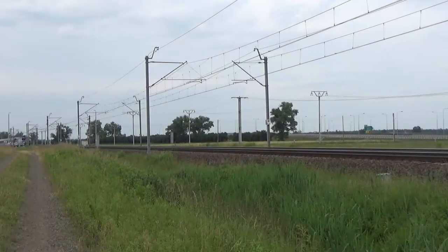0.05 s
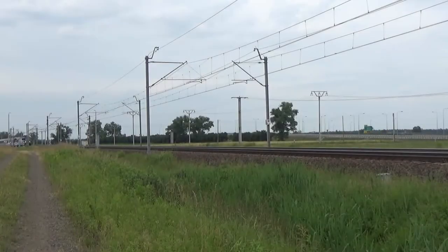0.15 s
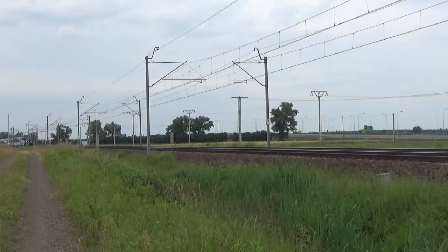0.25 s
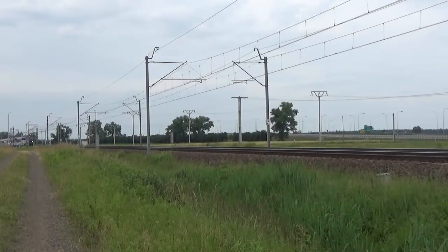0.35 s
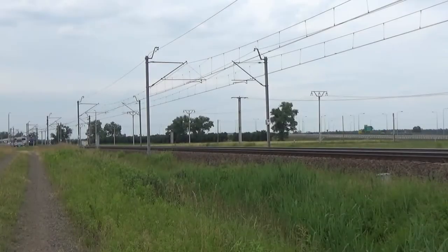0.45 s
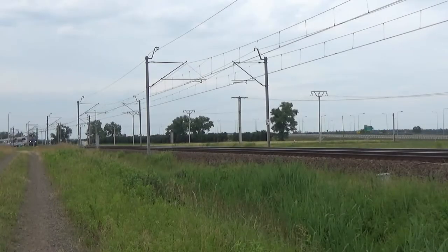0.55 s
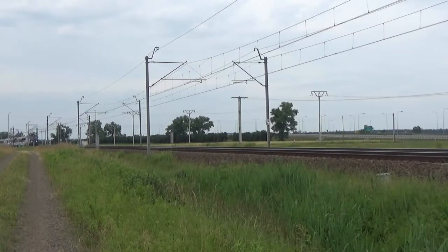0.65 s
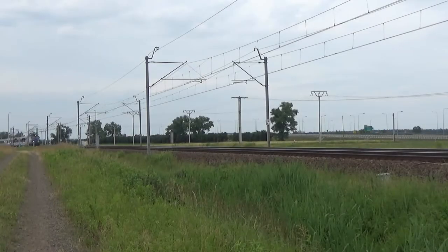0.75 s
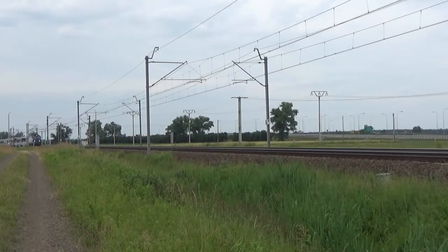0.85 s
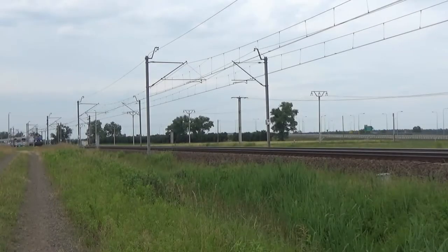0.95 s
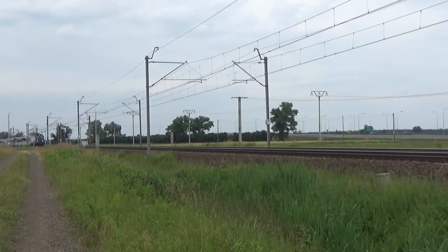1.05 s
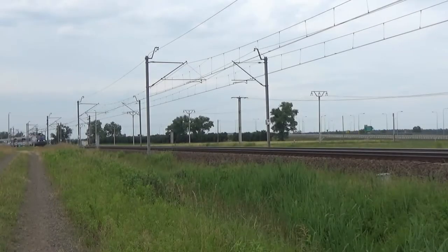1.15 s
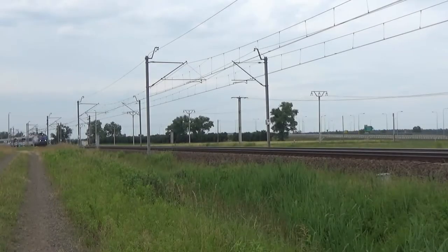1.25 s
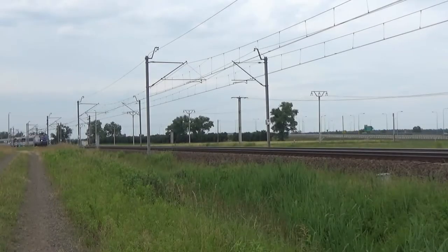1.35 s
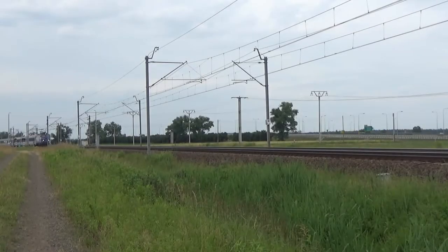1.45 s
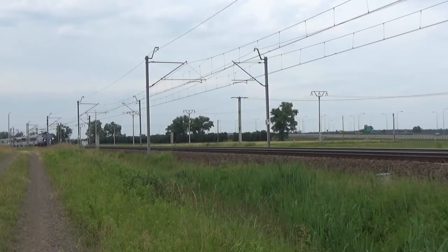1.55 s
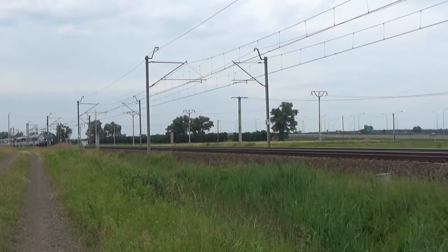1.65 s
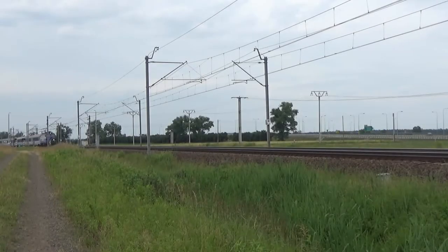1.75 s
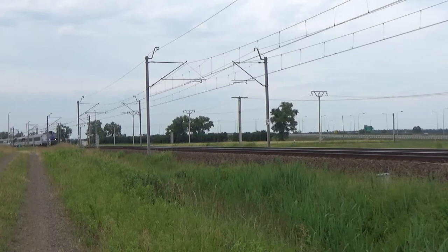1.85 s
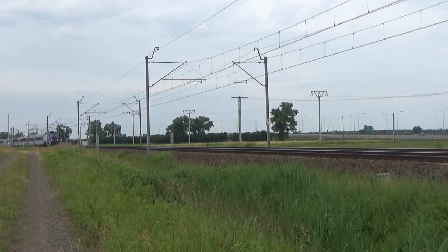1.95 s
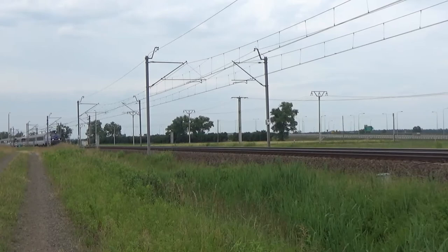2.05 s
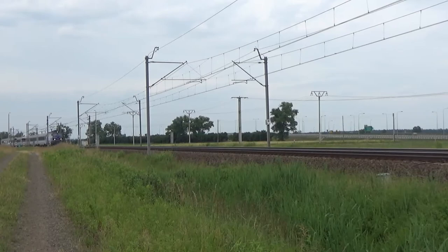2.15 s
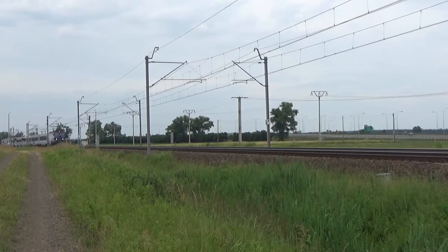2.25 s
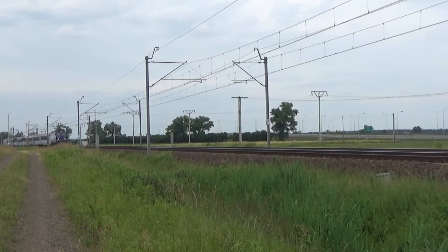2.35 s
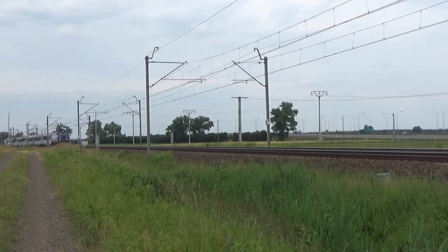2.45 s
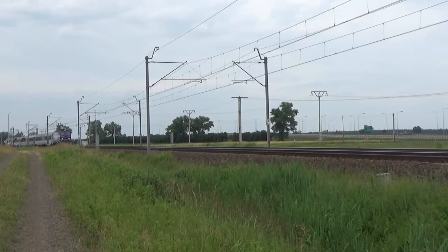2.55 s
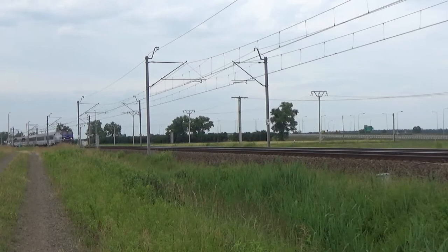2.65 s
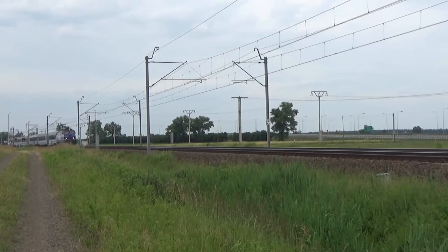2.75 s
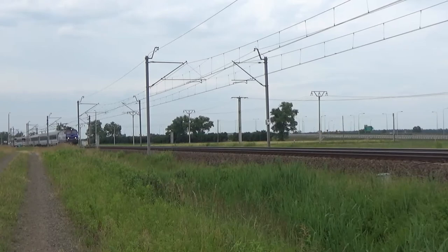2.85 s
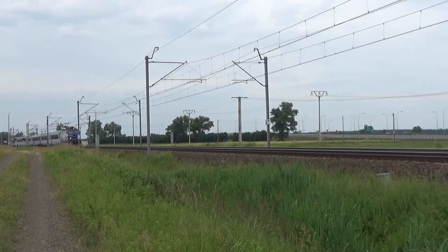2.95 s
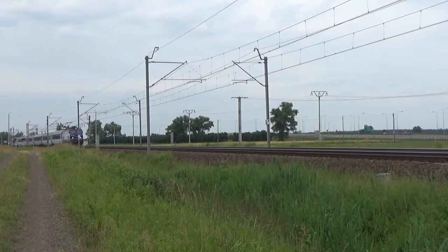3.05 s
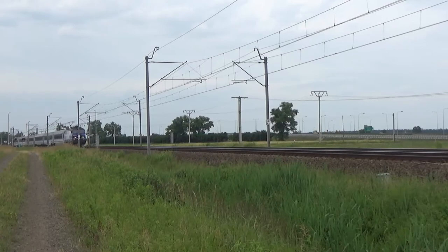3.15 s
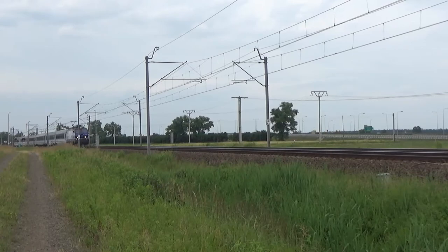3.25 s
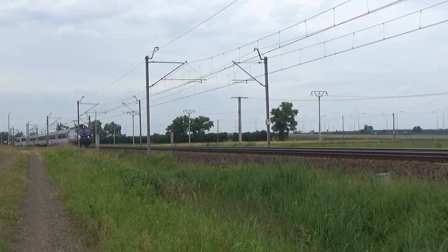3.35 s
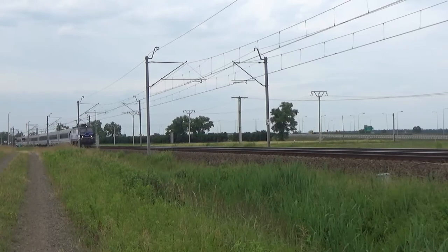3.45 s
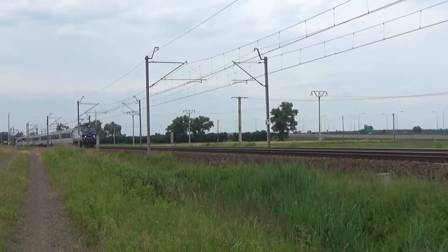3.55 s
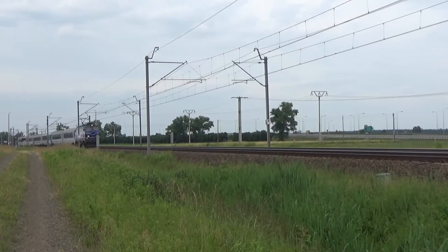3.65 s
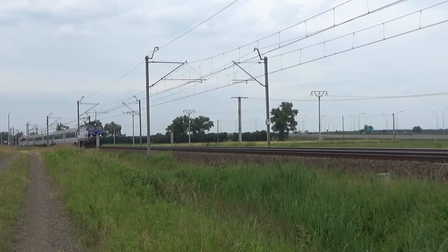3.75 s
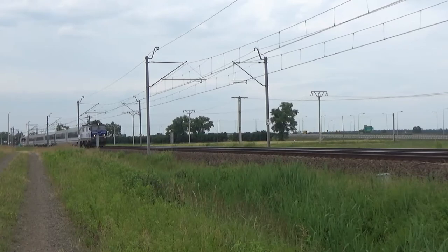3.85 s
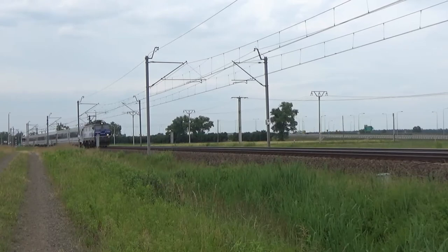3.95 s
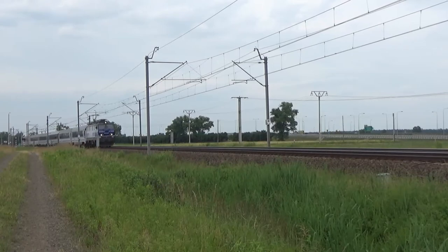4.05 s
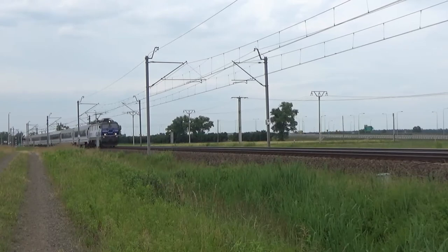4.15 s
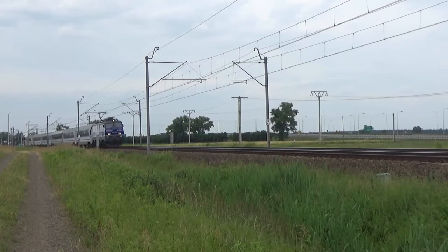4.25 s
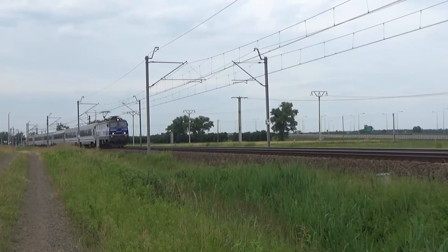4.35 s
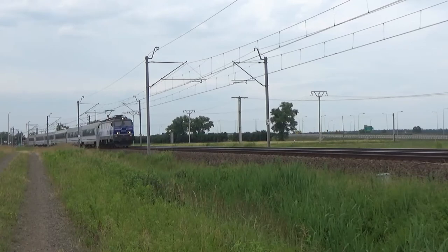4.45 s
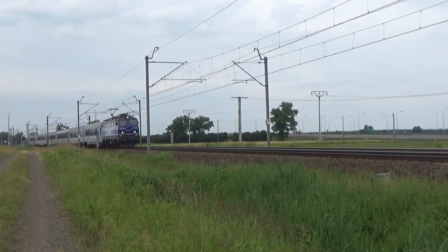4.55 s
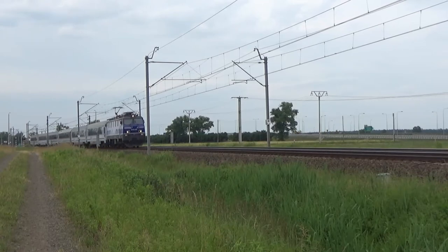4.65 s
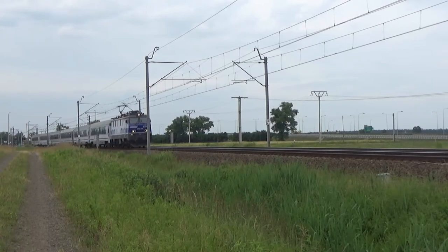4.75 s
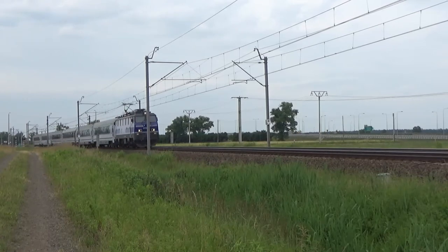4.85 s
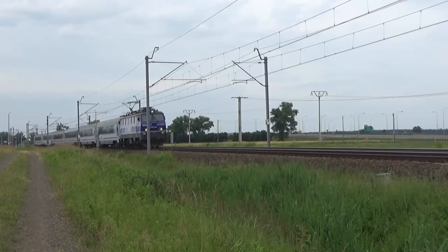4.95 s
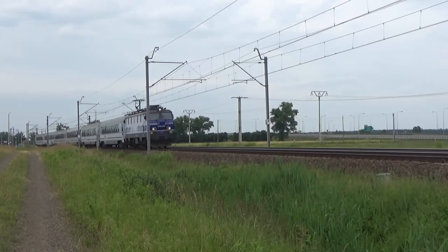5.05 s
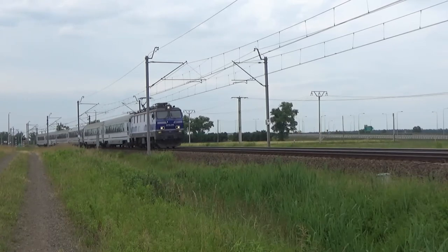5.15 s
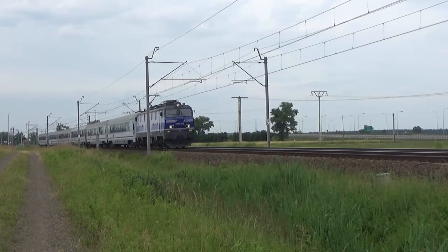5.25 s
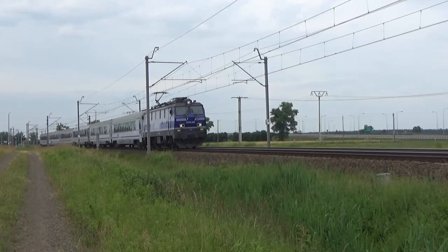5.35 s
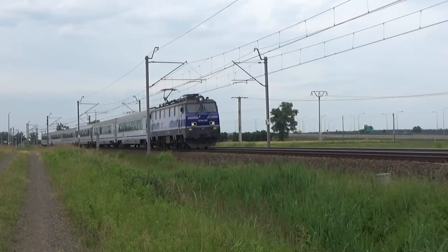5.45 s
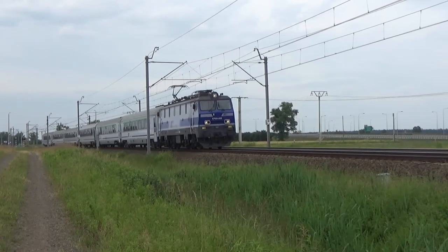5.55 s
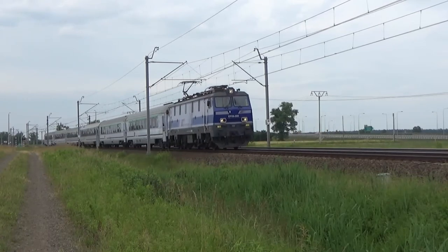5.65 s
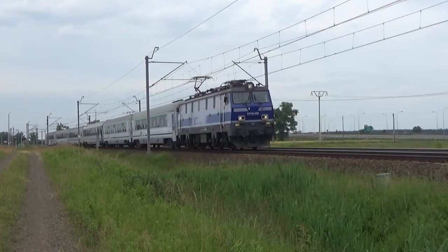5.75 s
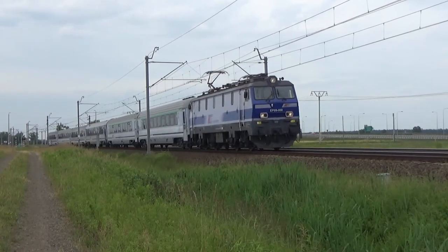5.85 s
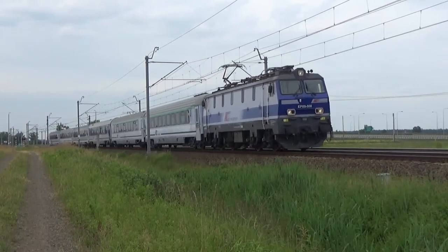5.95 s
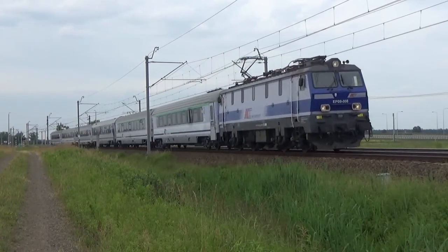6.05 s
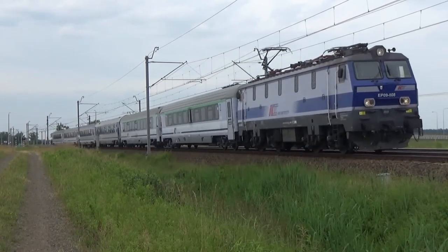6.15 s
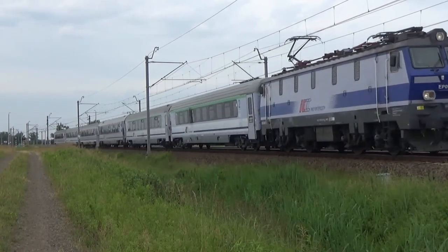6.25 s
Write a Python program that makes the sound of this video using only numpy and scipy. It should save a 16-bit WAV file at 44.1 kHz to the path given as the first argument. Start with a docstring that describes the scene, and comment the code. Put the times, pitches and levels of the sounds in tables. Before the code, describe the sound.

In open country beside a railway line, an electric passenger train roars far off with a faint gear note. A small bird on the right ticks, trills and jangles. Meanwhile the rails start singing on the right, with metallic zings running ahead of the wheels. Rumble and hiss swell steadily as the train nears the trackside microphone, joined by overhead wire sizzle and a thin whine that dips slightly in pitch.

```python
"""Grass beside a railway line: an electric locomotive with coaches approaches at speed.
Its wheels roar far off; then the rails on the right sing ahead of it, and rumble and hiss swell.
Later the pantograph sizzles along the wire; a gear note and a thin whine sink in pitch (Doppler).
In the field insects fizz faintly, a grasshopper rasps, and a bunting ticks, trills and jangles."""
import sys
import numpy as np
from scipy.fft import rfft, irfft, next_fast_len
from scipy.io import wavfile
from scipy.ndimage import map_coordinates

SR = 44100
rng = np.random.default_rng(int(sys.argv[2]) if len(sys.argv) > 2 else 0)


def dump_mix(stems):
    """Bounce the given channels to the path in sys.argv[1] as a 16-bit WAV at rate SR."""
    frames = np.atleast_2d(stems).T  # one column per channel
    limited = np.clip(frames, -1, 1)  # hard clip at full scale
    pcm = np.round(limited * 32767).astype(np.int16)
    wavfile.write(sys.argv[1], SR, pcm)


N = 278712
SPEED_M_PER_S, SOUND_M_PER_S = 40, 343
ABREAST_S = 6.6  # train draws level with the listener
TRACK_M, NEAR_M = 12, 35  # track offset; range within which a long train grows no louder


def amp(db):
    """Decibels to gain."""
    return 10 ** (np.asarray(db) / 20)


def unit(x):
    """Scale to rms 1."""
    return x / np.sqrt(np.mean(x ** 2) + 1e-20)


def clock():
    """Sample times [s]."""
    return np.arange(N) / SR


def curve(rows):
    """Per-sample line through (time [s], value) rows."""
    return np.interp(clock(), *np.transpose(rows))


def ramp(start_s, rise_s):
    """Linear rise from 0 to 1."""
    return np.clip((clock() - start_s) / rise_s, 0, 1)


def bumps(rows):
    """Gaussian swells from (time [s], height, half length [s]) rows."""
    return sum(height * np.exp(-((clock() - s) / half_s) ** 2) for s, height, half_s in rows)


def wobble(rate_hz):
    """Smooth random curve, rate_hz knots a second."""
    return map_coordinates(rng.standard_normal(int(N * rate_hz / SR) + 4), [clock() * rate_hz])


def filtered(x, response):
    """Apply a frequency response by zero-padded FFT."""
    size = next_fast_len(N + 8192)
    return irfft(rfft(x, size) * response(np.fft.rfftfreq(size, 1 / SR)), size)[..., :N]


def colour(points):
    """Response through (frequency [Hz], level [dB]) points; 40 dB down an octave beyond each end."""
    knots_hz, db = np.transpose(points)
    knots_hz = np.r_[knots_hz[0] / 2, knots_hz, knots_hz[-1] * 2]
    db = np.r_[db[0] - 40, db, db[-1] - 40]
    return lambda hz: amp(np.interp(np.log(hz + 1), np.log(knots_hz), db))


def resonances(modes):
    """Response of (frequency [Hz], width [Hz], level [dB]) modes; powers add."""
    return lambda hz: np.sqrt(sum((amp(db) / (1 + ((hz - centre_hz) / width_hz) ** 2)) ** 2
                                  for centre_hz, width_hz, db in modes))


def panned(x, left_db):
    """Pan by level of left over right."""
    return x * amp([[left_db / 2], [-left_db / 2]])


def rush(response, side_db, left_db):
    """Filtered stereo noise; side_db sets the width."""
    mid, side = unit(filtered(rng.standard_normal((2, N)), response))
    return panned(mid + amp(side_db) * np.array([side, -side]), left_db)


def tone(hz, drift_hz, drift_rate_hz):
    """Sine of rms 1 with random pitch tremble."""
    return np.sqrt(2) * np.sin(2 * np.pi * np.cumsum(hz + drift_hz * wobble(drift_rate_hz)) / SR)


def to_go_m():
    """Track left until the train is abreast."""
    return SPEED_M_PER_S * (ABREAST_S - clock())


def distance_m():
    """Effective range of the train, levelling off at NEAR_M."""
    return (NEAR_M ** 4 + to_go_m() ** 4) ** (1 / 4)


def approach(near_db, doubling_db=0, db_per_m=0, carry=0):
    """Level [dB] of a train source after spreading, absorption and the field's varying carry."""
    # how well sound carries over the field: (time [s], relative level [dB])
    field_carry = [(0, -4.5), (1.2, .5), (1.8, 1.0), (2.55, 3.7), (3.75, -.1), (6.32, .5)]
    range_m = distance_m()
    spreading_db = doubling_db * np.log2(range_m / NEAR_M)
    absorption_db = db_per_m * (range_m - NEAR_M)
    return near_db - spreading_db - absorption_db + carry * curve(field_carry)


def wheels():
    """Rough steel rolls on steel: the roar carries far, hiss and wheel ringing only from close by."""
    # spectra: (frequency [Hz], relative density [dB])
    ground_band = [(15, -1), (30, 1), (55, 1), (82, 6), (105, -2), (160, -12)]  # deep bass of the moving mass
    rumble_band = [(45, -34), (85, -18), (120, -12.5), (150, -11.5), (200, -6.5), (250, -6), (305, 0),
                   (370, -1), (440, -4.5), (520, -2), (640, -14)]
    roar_band = [(390, -24), (480, -15.5), (530, -10.5), (590, -7.5), (690, -10), (820, -2), (1030, -5),
                 (1260, -0.5), (1370, 2.5), (1520, -1), (2000, -2), (2900, -6.5), (3500, -12.5),
                 (4800, -21), (6500, -40)]
    top_band = [(2600, -15), (3800, -2), (5000, -2), (6000, -7), (7500, -15), (9000, -24)]  # roar's treble, absorbed by air
    hiss_band = [(2400, -16), (3200, -4.5), (4000, -0.5), (5000, -2.5), (6000, -3.5), (7000, -4),
                 (8000, -4.5), (9300, -5.5), (10500, -12.5), (11500, -16), (15500, -37)]
    # wheel modes: (frequency [Hz], width [Hz], relative level [dB])
    wheel_modes = [(489, 40, -7.5), (621, 71, 0), (1110, 82, -3), (1470, 50, -8), (1688, 130, 2.5),
                   (2350, 43, -3)]
    air_db = .27 * wobble(14)  # flutter from moving air
    width_db = approach(near_db=0, doubling_db=2.4)  # train widens as it nears
    ground_db = approach(near_db=-54.8, doubling_db=6.7, carry=.3)
    rumble_db = approach(near_db=-32.9, doubling_db=7.5, carry=.55)
    roar_db = approach(near_db=-21.9, doubling_db=4.9, carry=1) + air_db
    top_db = approach(near_db=-34, doubling_db=2.7, db_per_m=.048, carry=1.55) + air_db
    hiss_db = approach(near_db=-25.6, doubling_db=1, db_per_m=.18) + air_db
    ring_db = approach(near_db=-22.1, doubling_db=1.7, db_per_m=.175)
    ground = amp(ground_db) * rush(colour(ground_band), side_db=1.5 * width_db - 10, left_db=-.8)
    rumble = amp(rumble_db) * rush(colour(rumble_band), side_db=width_db - 19.5, left_db=.5)
    roar = amp(roar_db) * rush(colour(roar_band), side_db=-15, left_db=.95)
    top = amp(top_db) * rush(colour(top_band), side_db=-20, left_db=.5)
    hiss = amp(hiss_db + .7 * wobble(25)) * rush(colour(hiss_band), side_db=-11.5, left_db=-1.5)
    ring = amp(ring_db) * rush(resonances(wheel_modes), side_db=-10.5, left_db=-3.5)
    return ground + rumble + roar + top + hiss + ring


def high_sizzle():
    """Faint insect fizz in the grass at first, then the pantograph sliding on the wire."""
    # steady top treble: (time [s], relative level [dB])
    treble_levels = [(0.0, -70), (1.41, -64), (3.03, -54), (3.41, -49), (4.61, -49), (5.23, -43),
                     (6.32, -44)]
    # spurts where wire contact lightens: (time [s], level [dB], half length [s])
    spurts = [(3.29, -49, .07), (4.382, -47, .03), (4.58, -49, .03), (5.068, -42, .035), (5.276, -37, .04),
              (5.496, -37, .05), (5.756, -40, .03)]
    # spectra: (frequency [Hz], relative density [dB])
    treble_band = [(5000, -20), (8000, -28), (9800, 3), (10300, 8), (11600, 1.5), (12500, 2), (13100, 4.5),
                   (14500, 0), (15600, -3)]
    spurt_band = [(5000, -20), (8500, -6), (10500, 2), (13000, 6), (14000, -7), (15600, -11)]
    steady_db = curve(treble_levels) + 3.5 + .9 * wobble(20)
    steady = amp(steady_db) * rush(colour(treble_band), side_db=-19, left_db=.5)
    spurt_gain = bumps([(s, amp(db), half_s) for s, db, half_s in spurts]) * amp(2.2 * wobble(300))
    return steady + spurt_gain * rush(colour(spurt_band), side_db=-17, left_db=0)


def drive():
    """Locomotive gear note and high whine; their Doppler shift falls as the train draws level."""
    whine_hz, gear_hz = 9465, 1780  # as heard at 0 s
    # gear note surfacing from the roar: (time [s], level [dB], half length [s])
    gear_swells = [(.68, -45.5, .08), (.87, -47.5, .13), (1.75, -48, .2), (2.65, -44.5, .18),
                   (3.45, -47, .15)]
    closing_m_per_s = SPEED_M_PER_S * to_go_m() / np.hypot(TRACK_M, to_go_m())
    doppler = 1 / (1 - closing_m_per_s / SOUND_M_PER_S)
    doppler = doppler / doppler[0]
    whine_db = approach(near_db=-44, db_per_m=.22) + 2 * wobble(45)
    whine = amp(whine_db) * tone(whine_hz * doppler, drift_hz=30, drift_rate_hz=230)
    gear_gain = amp(approach(near_db=-47.6, doubling_db=2.6))
    gear_gain += bumps([(s, amp(db), half_s) for s, db, half_s in gear_swells])
    gear = amp(1.2 * wobble(10)) * tone(gear_hz * doppler, drift_hz=4.46, drift_rate_hz=50)
    upper = amp(-9 + 2.5 * wobble(8)) * tone(gear_hz * 5 / 4 * doppler, drift_hz=8, drift_rate_hz=50)
    return panned(whine + gear_gain * (gear + upper), left_db=1.5)


def grasshopper():
    """Each stroke of the file is a grainy rasp in the wings' band."""
    # strokes: (time [s], level [dB], half length [s])
    rasps = [(.86, -66, .06), (1.13, -61, .05), (1.73, -62, .04)]
    # wing resonance: (frequency [Hz], width [Hz], relative level [dB])
    wing_modes = [(13400, 800, 0)]
    strokes = bumps([(s, amp(db), half_s) for s, db, half_s in rasps])
    return strokes * amp(2 * wobble(200)) * rush(resonances(wing_modes), side_db=-16, left_db=0)


def chip(time_s, hz, sweep_hz, half_s):
    """One bird note of peak 1, sweeping through hz at time_s."""
    u = np.linspace(-3, 3, int(6 * half_s * SR))  # time in half lengths
    note = np.exp(-u ** 2) * np.sin(2 * np.pi * np.cumsum(hz + sweep_hz * np.tanh(u)) / SR)
    start = int(time_s * SR) - len(u) // 2
    return np.pad(note, (start, N - start - len(u)))


def bunting():
    """Upswept ticks speed up, climb through a trill and tumble into a jangle of random notes."""
    # opening ticks: (time [s], level [dB])
    ticks = [(1.275, -52), (1.476, -44), (1.641, -42.5), (1.784, -40)]
    # closing jangle: (start [s], end [s], mean pitch [Hz], mean level [dB])
    jangle = [(2.25, 2.36, 4750, -48), (2.401, 3.12, 5400, -49.5), (2.52, 3, 7250, -45.5)]
    tick_hz, top_hz, climb = 6100, 7100, .45  # climb: share of the gap to top_hz closed per note
    trill_start_s, trill_gap_s, trill_db, jangle_gap_s = 1.901, .0502, -44, .025
    notes = [(s, tick_hz, db) for s, db in ticks]
    for k in range(7):
        trill_hz = top_hz - (top_hz - tick_hz) * (1 - climb) ** (k + 1)
        notes.append((trill_start_s + k * trill_gap_s, trill_hz, trill_db))
    song = sum(amp(db) * chip(s, hz, sweep_hz=899, half_s=.0027) for s, hz, db in notes)
    for start_s, end_s, hz, db in jangle:
        for s in np.arange(start_s, end_s, jangle_gap_s):
            late, pitch, sweep, size = rng.standard_normal(4)
            note = chip(s + .008 * late, hz + 220 * pitch, sweep_hz=400 * sweep, half_s=.005)
            song += amp(db + 1.84 * size) * note
    return panned(song, left_db=-14)


def tread_knocks(rate_hz, scatter, spread_db):
    """Impulses of uneven treads on the rail, rms 1; scatter is timing jitter in periods."""
    late, size = rng.standard_normal((int(N / SR * rate_hz), 2)).T
    at = (np.arange(len(late)) + scatter * late) * SR / rate_hz
    return unit(np.bincount(np.clip(at, 0, N - 1).astype(int), amp(spread_db * size), N))


def zing(band, noise_db, side_db, left_db):
    """High bending waves outrun low ones along a rail: knocks become falling chirps, over noise."""
    travel_s = .24  # at 1 kHz
    dispersion = lambda hz: np.exp(-4j * np.pi * travel_s * np.sqrt(1000 * hz))
    knocks = tread_knocks(rate_hz=34, scatter=.16, spread_db=2.5)
    chirps = unit(filtered(knocks, lambda hz: colour(band)(hz) * dispersion(hz)))
    wash = amp(noise_db) * rush(colour(band), side_db, left_db)
    return (panned(chirps, left_db - 1.5) + wash) / np.hypot(1, amp(noise_db))


def rails():
    """Rails on evenly spaced sleepers pass only some bands, which sing far ahead of the wheels."""
    # pass bands: (frequency [Hz], relative density [dB])
    low_band = [(450, -51), (570, -16), (660, -5.5), (720, -1), (790, -1.5), (880, 1), (950, 0.5),
                (1010, -3), (1150, -25)]
    span_band = [(980, -40), (1080, -5), (1170, -2), (1230, -0.5), (1280, -2.5), (1330, -2), (1352, -5),
                 (1378, -23), (1550, -39)]
    head_band = [(5700, -35), (6150, -7.5), (6400, 1.5), (6600, -1.5), (6800, 1.5), (7080, 3.5),
                 (7300, -15), (7900, -28), (9800, -26), (10300, -15), (10800, -19.5), (11600, -35)]
    # sharp ring at the span band's upper edge: (frequency [Hz], width [Hz], relative level [dB])
    edge_modes = [(1292, 9.3, -7.5), (1326, 14.6, -5.5)]
    # low band swells: (time [s], boost [dB], half length [s])
    swells = [(1.91, 5.5, .035), (2.05, 3, .06), (2.215, 7, .015), (2.53, 4.5, .04), (2.85, 7.5, .04),
              (3.11, 3, .033), (3.75, 2.5, .15), (5.55, 3.5, .034)]
    onset_s = 1.82  # wheels reach the singing stretch
    step_s, step_db, whistle_hz = 4.14, 3.3, 9545
    fade_db = -6.5 * (NEAR_M / distance_m()) ** 2  # close by, chirps merge into the train's noise
    low_db = approach(near_db=-27.1, db_per_m=.093) + step_db * ramp(step_s, rise_s=.12) + bumps(swells)
    span_db = approach(near_db=-23.3, db_per_m=.075) + .25 * fade_db
    ring_db = approach(near_db=-26.7, db_per_m=.042) + 1.3 * fade_db
    head_db = approach(near_db=-33.4, db_per_m=.11) + fade_db
    whistle_db = approach(near_db=-62.8, db_per_m=.056) + 9.5 * ramp(onset_s, rise_s=.35) + 1.5 * fade_db
    low = amp(low_db) * zing(low_band, noise_db=3 - fade_db, side_db=-12, left_db=-4.5)
    span = amp(span_db) * zing(span_band, noise_db=.5 - fade_db, side_db=-8, left_db=-7)
    ring = amp(ring_db) * rush(resonances(edge_modes), side_db=-13, left_db=-6)
    head = amp(head_db + .93 * wobble(60)) * rush(colour(head_band), side_db=-6.5, left_db=-9)
    whistle = amp(whistle_db + 3 * wobble(45)) * tone(whistle_hz, drift_hz=42, drift_rate_hz=230)
    return ramp(onset_s, rise_s=.045) * (low + span) + ramp(onset_s, rise_s=.19) * (ring + head) + whistle


def scene():
    """Open country, no echoes."""
    return wheels() + high_sizzle() + drive() + grasshopper() + bunting() + rails()


def record(dry):
    """Brick-wall low-pass."""
    cutoff_hz = 15750
    return filtered(dry, lambda hz: hz < cutoff_hz)


dry = scene()
out = record(dry)
dump_mix(out)
```